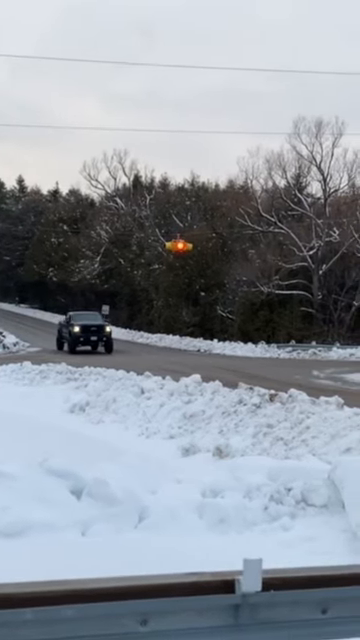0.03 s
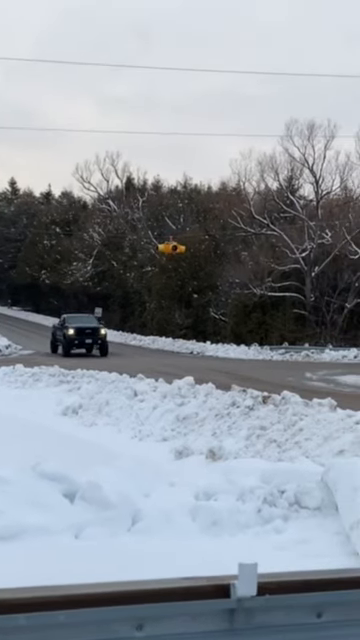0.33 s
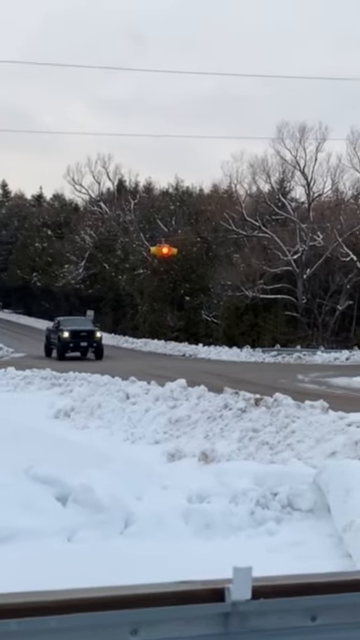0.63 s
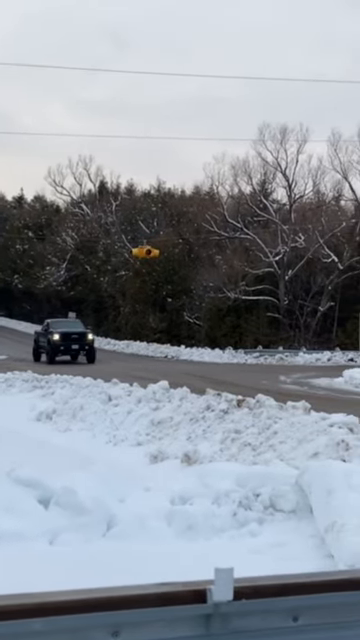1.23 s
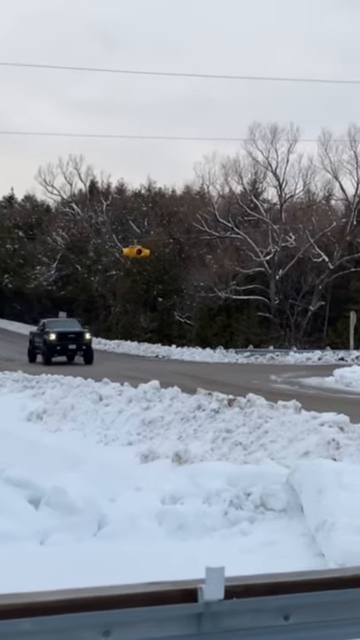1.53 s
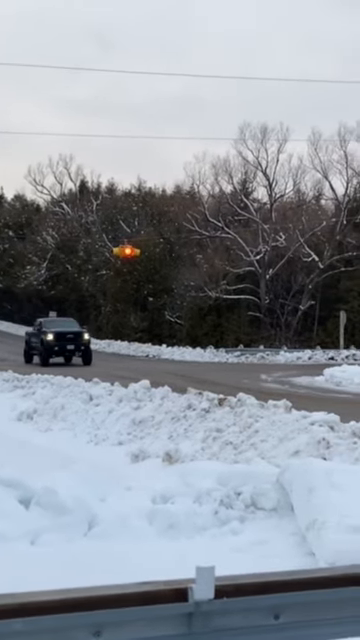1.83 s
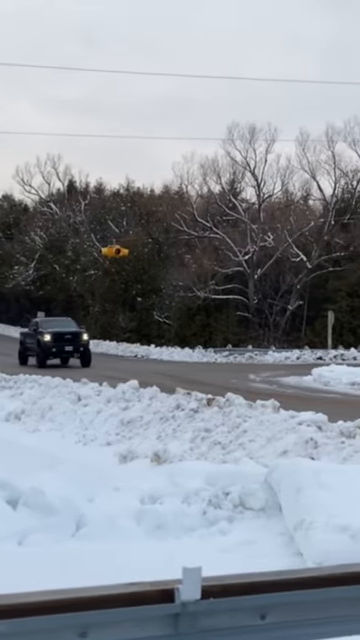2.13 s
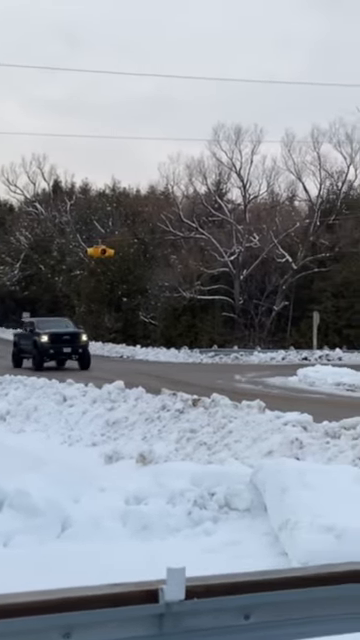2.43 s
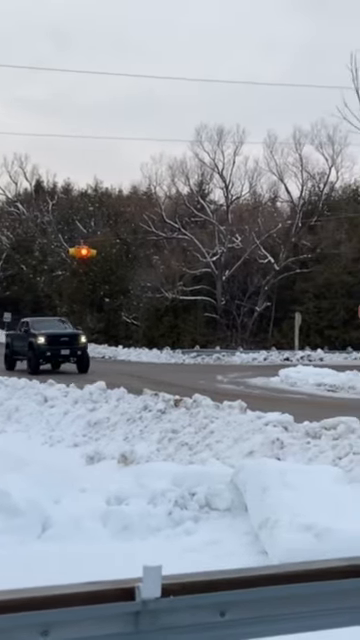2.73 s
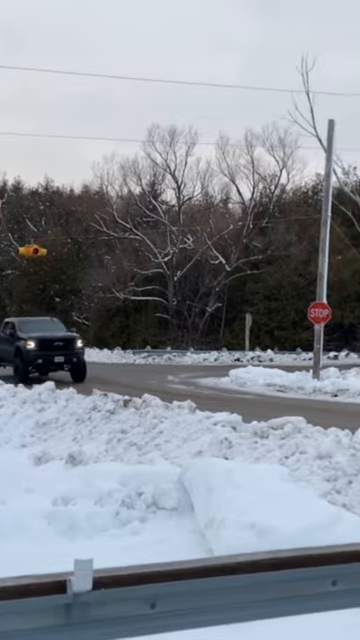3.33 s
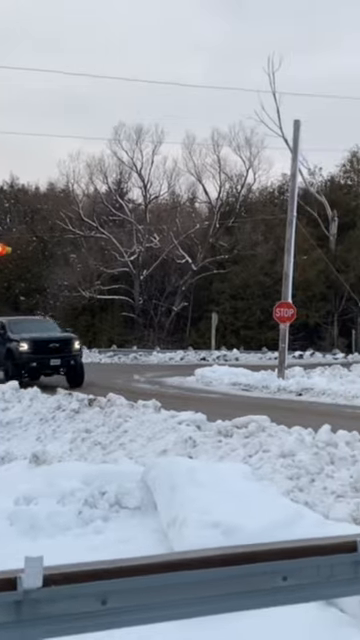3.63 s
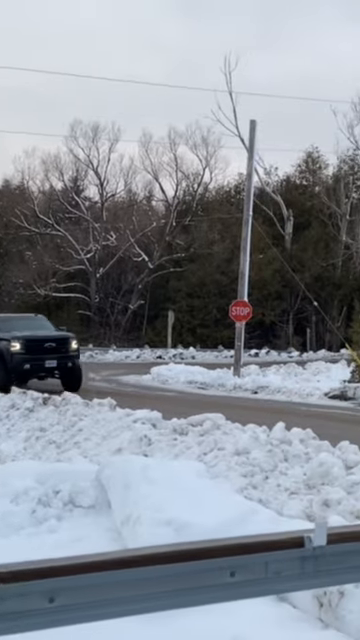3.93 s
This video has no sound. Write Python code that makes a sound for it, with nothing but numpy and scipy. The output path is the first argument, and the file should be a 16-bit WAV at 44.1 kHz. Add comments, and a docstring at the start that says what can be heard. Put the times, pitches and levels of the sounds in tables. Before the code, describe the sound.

A pickup truck approaches, its exhaust burbling and engine rattling as the pitch climbs, with a few short knocks from about 1 second. At 1.8 seconds it pulls hard into a throaty roar, loudest around 2.5 seconds as wet tyre hiss swells. It eases off near 3 seconds, then picks up again from 3.6 seconds with more tyre spray. Low wind rumble grows underneath.

```python
"""On a snowy road, a V8 pickup comes towards the listener, pulls hard for a second, eases off, pulls again.
Two rows of cylinders fire unevenly into one pipe, so the exhaust burbles and growls. Its tones, called
orders, are whole multiples of the engine's cycle rate. The engine bay rattles, knocks a few times and,
under load, roars in time with the firings and howls. Tyre noise and spray swell on the wet road as the
truck nears, over a low rumble of wind."""
import sys
import numpy as np
from scipy import signal
from scipy.fft import rfft, irfft
from scipy.io import wavfile
from scipy.ndimage import uniform_filter1d

SR = 44100
rng = np.random.default_rng(int(sys.argv[2]) if len(sys.argv) > 2 else 0)


def inscribe(sig):
    """Save sig as 16-bit PCM at rate SR to the path in sys.argv[1].

    A 1-D sig is mono; a 2-D sig holds one channel per row.
    Samples are clipped to [-1, 1] before scaling.
    """
    pcm = np.round(np.clip(np.atleast_2d(sig).T, -1, 1) * 32767)
    wavfile.write(sys.argv[1], SR, pcm.astype(np.int16))


N = 176400
TIME = np.arange(N) / SR
FREQS = np.fft.rfftfreq(N, 1 / SR)
WAVER_HZ = 7  # how fast each engine tone wavers in level

# which row of cylinders each of the eight firings comes from: 0 near, 1 far
FIRING_ROW = [1, 0, 1, 1, 0, 1, 0, 0]


def amp(db):
    """Turns decibels into a number to multiply by."""
    return 10 ** (np.asarray(db) / 20)


def unit_level(x):
    """Scales a signal to an average size (rms) of one."""
    return x / np.sqrt(np.mean(x ** 2) + 1e-20)


def at_hz(points, hz):
    """Reads a table at the given frequencies, on a log-frequency axis."""
    f, value = np.transpose(points)
    return np.interp(np.log(hz + 1), np.log(f + 1), value)


def over_time(points):
    """Reads a table of times and values at every sample."""
    return np.interp(TIME, *np.transpose(points))


def drift(hz):
    """A smooth random wobble of size one, up to about the given rate."""
    return unit_level(irfft(rfft(rng.standard_normal(N)) / (1 + (FREQS / hz) ** 4), N))


def to_stereo(left, right, swing_s=(2, 3.7), swing_ratio=1.018):
    """Turns two spectra into left and right sound; delay and shading shift as the truck swings aside."""
    # how far the left side leads: f/Hz, phase/rad
    left_lead = [(170, 0.24), (300, 0.41), (570, 1.63), (820, 0.77), (1100, 1.46), (1400, 3.1), (1600, 6.7),
                 (2000, 9.58), (2400, 11.15), (2800, 16.3), (3400, 21.8), (3550, 16.63), (4300, 21.85),
                 (4650, 19.2), (5300, 23), (6000, 21.5), (7000, 26.44), (11000, 31.26), (15000, 37)]
    # how much louder the left side is: f/Hz, level/dB
    balance = [(120, -0.5), (340, -1.5), (550, 2.5), (690, 10.5), (900, 2.5), (1250, -2), (1500, 13),
               (1820, -5.5), (2550, 5.5), (3050, -0.5), (3500, 3.5), (3950, -2), (4450, 5.5), (5000, -2),
               (10000, -1)]

    def facing(hz):
        tilt = amp(at_hz(balance, hz))
        delay = np.exp(-1j * at_hz(left_lead, hz))
        return irfft(np.array([left * tilt, right * delay]) * np.sqrt(2 / (1 + tilt ** 2)), N)
    swing = np.interp(TIME, swing_s, [0, 1])
    return (1 - swing) * facing(FREQS) + swing * facing(FREQS / swing_ratio)


def coloured(noise_pair, colour):
    """Gives two noises a tone colour and makes them partly alike; the result has size one."""
    # how alike left and right are: f/Hz, likeness from 0 to 1
    likeness = [(150, 1), (450, 0.73), (700, 0.74), (1250, 0.99), (2000, 0.89), (2500, 0.26), (3800, 1),
                (7000, 0.53), (14000, 1)]
    left, other = rfft(noise_pair) * amp(at_hz(colour, FREQS))
    same = np.clip(at_hz(likeness, FREQS), 0, 1)
    right = same * left + np.sqrt(1 - same ** 2) * other
    return unit_level(to_stereo(left, right))


def patchy_noise(patchy_db, patch_bins=4, patch_frames=9):
    """Two noises in which small patches of low or high sound briefly get louder or softer."""
    frames = signal.stft(rng.standard_normal((2, N)), nperseg=1024, noverlap=768)[2]
    patches = rng.standard_normal(frames.shape[:0:-1]).T
    patches = uniform_filter1d(patches, patch_bins, axis=0)  # smooth across frequency
    patches = unit_level(uniform_filter1d(patches, patch_frames, axis=1))  # and across time
    return signal.istft(frames * amp(patchy_db * patches), nperseg=1024, noverlap=768)[1][:, :N]


def exhaust(cycles, rate, lumpy_db=0.98, main_waver_db=0.4, weak_waver_db=1.6, far_lag_cycles=0.03):
    """Two rows of cylinders fire unevenly into one pipe, giving a lumpy stack of low tones."""
    # strongest tones, listed by order: t/s, level/dB
    main_orders = { 3: [(0, -68), (1.3, -54), (1.9, -41), (2.2, -35.5), (2.6, -31), (2.9, -39.5),
                   (3.3, -35.5), (3.7, -34.5), (4, -28)], 5: [(0, -61.5), (.35, -40), (.7, -36), (1.3, -35),
                   (1.85, -30.5), (2.05, -33), (2.26, -43), (2.58, -35.5), (3.1, -44.5), (3.35, -31.5),
                   (3.62, -25.5), (3.8, -29.5), (4, -41)], 8: [(0, -40.5), (.2, -31), (.3, -35.5),
                   (.45, -43.5), (1, -40.5), (1.6, -37.5), (1.9, -31.5), (2.25, -34.5), (2.5, -43.5),
                   (2.95, -35), (3.35, -33.5), (4, -32)], 11: [(0, -73), (.4, -45), (1.6, -43.5),
                   (1.85, -55), (2.2, -45.5), (2.62, -39.5), (2.95, -55), (3.7, -55), (4, -46.5)]}
    # weaker tones: order, relative level/dB
    weak_orders = [(4, -9), (6, -8), (7, -3.5), (9, -14), (10, -17), (13, -11), (14, -18), (16, -12.5)]
    # rise and fall of all the weaker tones: t/s, level/dB
    burble = [(0, -41), (.6, -39), (1.6, -40.5), (2.4, -33.5), (3.1, -37.5), (4, -37.5)]
    # how the pipe boosts or cuts them: f/Hz, gain/dB
    pipe = [(45, -20), (62, -7), (100, -2), (130, -8.5), (180, 0.5), (235, -8.5), (275, -5.5), (310, 1),
            (400, -12)]
    levels = [(order, over_time(curve) + main_waver_db * drift(WAVER_HZ))
              for order, curve in main_orders.items()]
    for order, db in weak_orders:
        piped_db = db + over_time(burble) + at_hz(pipe, order * rate)
        levels.append((order, piped_db + weak_waver_db * drift(WAVER_HZ)))
    firings = np.arange(len(FIRING_ROW)) / len(FIRING_ROW) + far_lag_cycles * np.array(FIRING_ROW)
    spread = np.interp(TIME, (2.77, 3.3), [1, 0])  # close by, the tones line up into one thump a cycle
    tones = np.zeros(N)
    for order, db in levels:
        lead = np.angle(np.exp(-2j * np.pi * order * firings).sum())
        tones -= np.sqrt(2) * amp(db) * np.sin(2 * np.pi * order * cycles + spread * lead)
    spectrum = rfft(tones * amp(lumpy_db * drift(hz=35)))
    return to_stereo(spectrum, spectrum)


def wind(gust_db=4.0):
    """Wind makes a low rumble that flutters in quick gusts."""
    # strength of the wind: t/s, level/dB
    loudness = [(0, -50), (2, -51), (2.8, -45), (4, -40.5)]
    # colour of the rumble: f/Hz, relative level/dB
    colour = [(30, -21), (52, 1.5), (200, -3.5), (300, -15), (4000, -88)]
    rumble = coloured(rng.standard_normal((2, N)), colour)
    return rumble * amp(over_time(loudness) + gust_db * drift(hz=17))


def tyres():
    """The tread rolling on the wet road makes a rush that swells as the truck nears."""
    # swell of the rush: t/s, level/dB
    loudness = [(0, -56.5), (1.4, -54.5), (2.7, -36.5), (3.2, -46), (3.6, -43.5), (4, -35.5)]
    # colour of the rush: f/Hz, relative level/dB
    colour = [(100, -12), (260, -6.5), (600, -2.5), (1150, -2.5), (1500, -21.5), (2000, -13.5),
              (4000, -22.5), (8000, -39.5)]
    return coloured(patchy_noise(patchy_db=3.0), colour) * amp(over_time(loudness))


def firing_bursts(cycles, depth, decay_gaps, uneven_db, flicker_db=0.5):
    """A loudness curve that jumps at each firing and fades; decay is counted in gaps between firings."""
    firing = cycles * len(FIRING_ROW)
    strength = amp(uneven_db * np.clip(rng.standard_normal(N), -2, 2))[firing.astype(int)]
    bursts = 1 + depth * strength * np.exp(-(firing % 1) / decay_gaps)
    return unit_level(bursts * amp(flicker_db * drift(hz=22)))


def rattle(cycles):
    """The engine bay rattles with a short burst of noise at each firing."""
    # strength of the rattle: t/s, level/dB
    loudness = [(0, -57.5), (.35, -53.5), (0.501, -49), (1, -47), (1.3, -44), (1.75, -43.5), (2.7, -43.5),
                (3.1, -44), (3.28, -44), (3.38, -40), (3.45, -45), (4, -49.5)]
    # colour of the rattle: f/Hz, relative level/dB
    colour = [(150, -16), (400, -4), (750, 3), (1300, -1), (1850, 0.5), (2250, -5.5), (3900, -5.5),
              (5000, -10), (6200, -16.5), (7800, -33), (16000, -25)]
    bursts = firing_bursts(cycles, depth=1.1, decay_gaps=0.35, uneven_db=2)
    return coloured(patchy_noise(patchy_db=1.5) * bursts, colour) * amp(over_time(loudness))


def growl(cycles, rate, waver_db=3.5):
    """Higher exhaust tones glide through the pitches at which the pipe rings, each one wavering."""
    # strength of one tone before the pipe: t/s, level/dB
    loudness = [(0, -73), (1.5, -68.5), (2.4, -51.5), (3.1, -55), (4, -52)]
    # how the pipe boosts or cuts a tone: f/Hz, gain/dB
    pipe = [(340, -0.5), (430, -5.5), (580, 1.5), (640, -4), (720, -0.5), (850, -13.5)]
    tones = np.zeros(N)
    for order in range(17, 46):
        gain = amp(at_hz(pipe, order * rate) + waver_db * drift(WAVER_HZ))
        tones += gain * np.sin(2 * np.pi * (order * cycles + rng.random()))
    spectrum = rfft(np.sqrt(2) * tones * amp(over_time(loudness)))
    return to_stereo(spectrum, spectrum)


def spray(drops_per_s=5600, spread_db=2):
    """Fine drops thrown off the tread make a bright, grainy hiss."""
    # strength of the hiss: t/s, level/dB
    loudness = [(0, -76.5), (2.2, -58.5), (2.6, -51), (2.85, -57.5), (3.4, -58), (4, -51.5)]
    # colour of the hiss: f/Hz, relative level/dB
    colour = [(2500, -28), (4800, 2.5), (6600, 3.5), (8000, -1.5), (15500, -10)]
    size = amp(spread_db * np.minimum(rng.exponential(1, (2, N)), 4))
    drops = size * rng.standard_normal((2, N)) * (rng.random((2, N)) < drops_per_s / SR)
    return coloured(drops, colour) * amp(over_time(loudness))


def knocks(rise_s=0.00087, decay_s=0.02):
    """Single hard firings stand out as short, rasping bursts."""
    # the hard firings: t/s, peak level/dB
    hits = [(0.987, -44.5), (1.286, -44.5), (1.522, -39), (2.442, -32)]
    # colour of a knock: f/Hz, relative level/dB
    colour = [(300, -18), (1100, -1), (1650, -1.5), (2300, -17), (3700, -3), (12000, -50)]
    loudness = np.zeros(N)
    for start, db in hits:
        rise = np.clip((TIME - start) / rise_s, 0, 1)
        loudness += amp(db) * rise * np.exp(-abs(TIME - start - rise_s) / decay_s)
    return coloured(rng.standard_normal((2, N)), colour) * loudness


def roar(cycles):
    """When the engine pulls hard, longer bursts from the firings run together into a roar."""
    # strength of the roar: t/s, level/dB
    loudness = [(1.72, -77), (1.799, -36.5), (2, -32), (2.23, -31.5), (2.38, -28.5), (2.57, -29),
                (2.65, -31), (2.76, -29.5), (2.83, -44.5), (2.91, -46.5), (2.96, -34.5), (3.15, -68)]
    # colour of the roar: f/Hz, relative level/dB
    colour = [(200, -14.5), (600, -18.5), (710, -1), (900, -6.5), (1130, 0.5), (1400, -5.5), (1900, -3),
              (2400, -11), (3900, -10), (4300, -15.5), (4900, -14), (5400, -19), (7800, -32.5),
              (12000, -34.5), (16000, -33)]
    bursts = firing_bursts(cycles, depth=0.73, decay_gaps=1.0, uneven_db=2.5)
    return coloured(patchy_noise(patchy_db=3.0) * bursts, colour) * amp(over_time(loudness))


def howl(centre_hz=1120, width_hz=330, peak_db=-31.5, peak_s=2.396, span_s=0.19):
    """At full load a broad, throaty ringing in the roar swells and fades."""
    hz = np.geomspace(centre_hz / 10, centre_hz * 10, num=200)
    hump_db = -20 * np.log10(1 + ((hz - centre_hz) / width_hz) ** 2)
    swell = np.exp(-((TIME - peak_s) / span_s) ** 2)
    return amp(peak_db) * swell * coloured(rng.standard_normal((2, N)), np.transpose([hz, hump_db]))


def scene():
    """One engine speed drives rattle, roar, exhaust and growl; the other sounds are added to them."""
    # engine speed, with eight firings to a cycle: t/s, cycle rate/Hz
    speed = [(0,10.2),(0.11,10.9),(0.3,13.25),(0.5,15.05),(0.7,15.56),(1.1,15.53),(1.4,16.4),(1.65,17.65),(1.99,22.55),(2.31,26.7),(2.54,29.15),(2.61,28.9),(3.02,25.25),(3.3,23.55),(3.6,21.55),(3.79,22.7),(4,24.55)]
    rate = uniform_filter1d(over_time(speed), size=2500, mode="nearest")
    cycles = np.cumsum(rate) / SR
    engine = rattle(cycles) + roar(cycles) + exhaust(cycles, rate) + growl(cycles, rate)
    return engine + knocks() + howl() + tyres() + spray() + wind()


def record(dry):
    """Cuts away the very highest treble."""
    low_pass = signal.firwin(511, cutoff=15700, window=("kaiser", 9), fs=SR)
    return signal.oaconvolve(dry, low_pass[None], "same")


dry = scene()
out = record(dry)
inscribe(out)
```